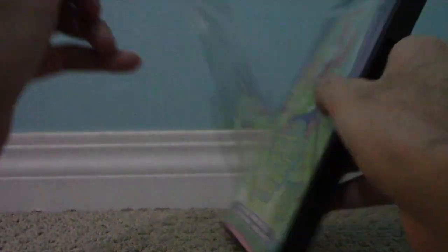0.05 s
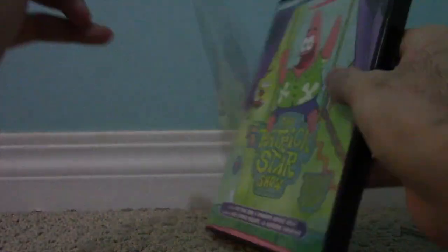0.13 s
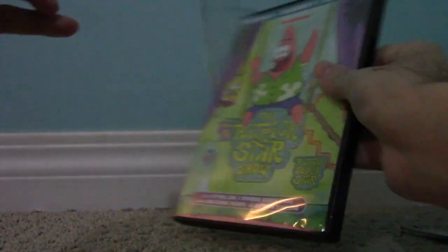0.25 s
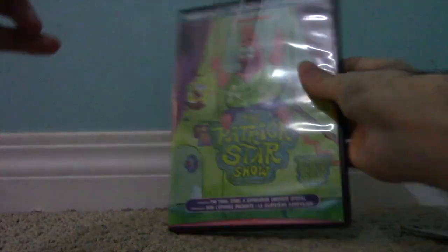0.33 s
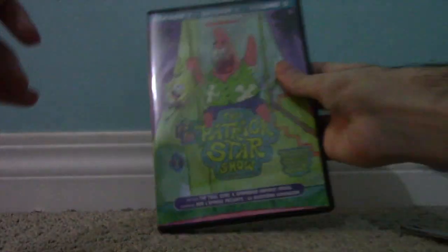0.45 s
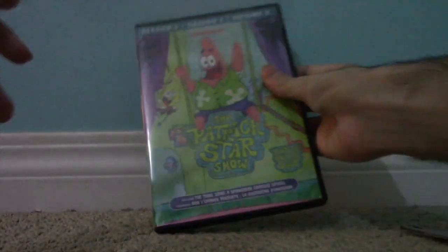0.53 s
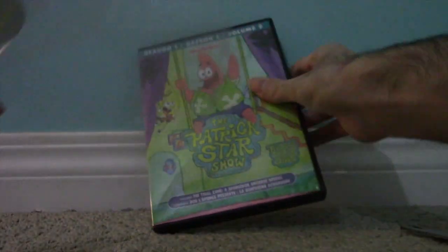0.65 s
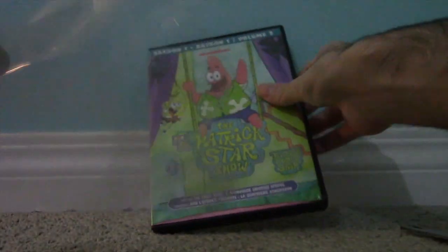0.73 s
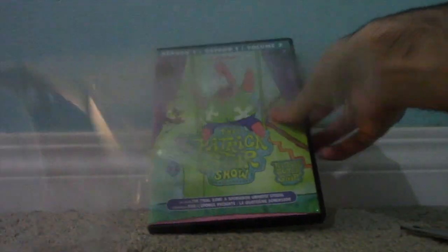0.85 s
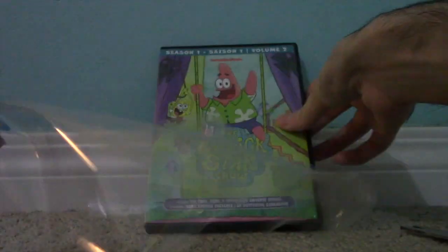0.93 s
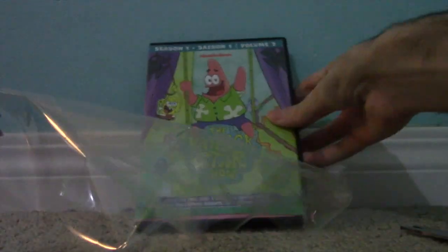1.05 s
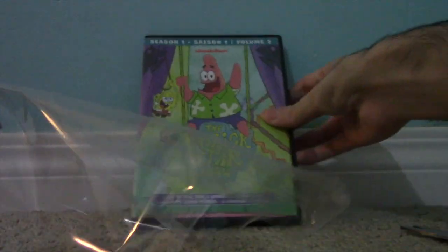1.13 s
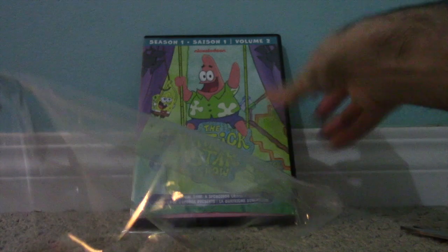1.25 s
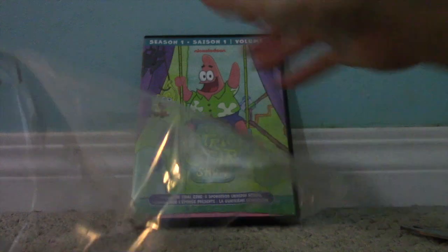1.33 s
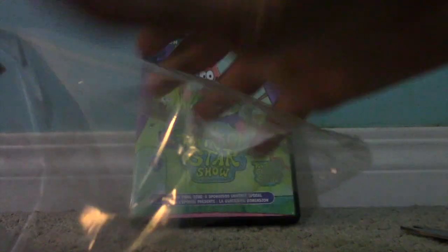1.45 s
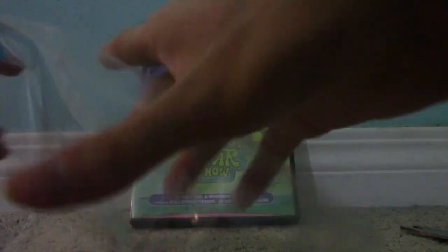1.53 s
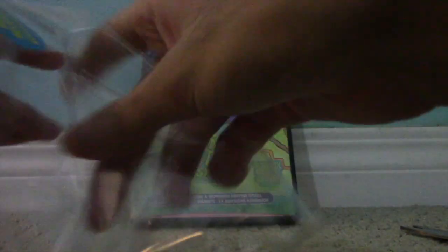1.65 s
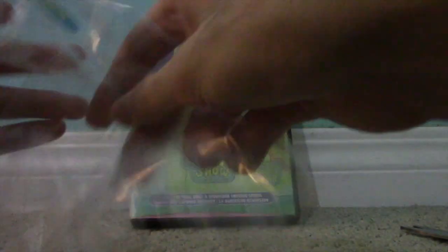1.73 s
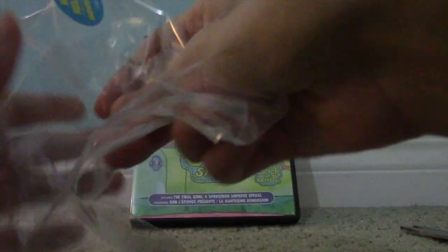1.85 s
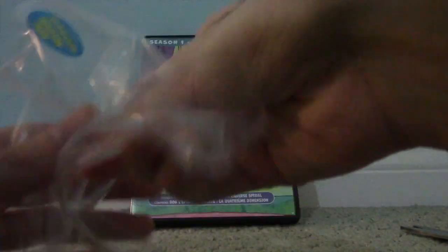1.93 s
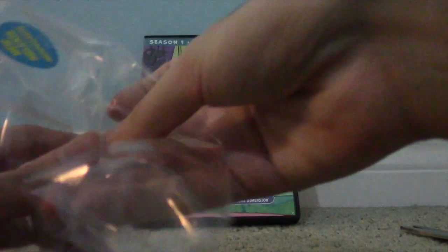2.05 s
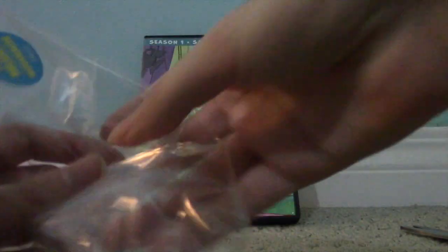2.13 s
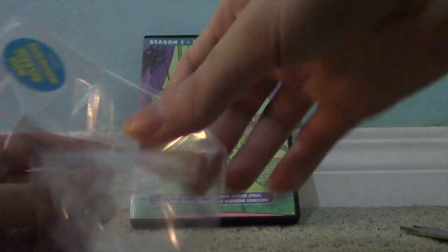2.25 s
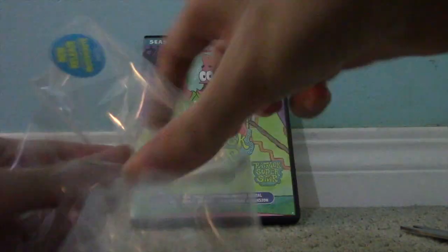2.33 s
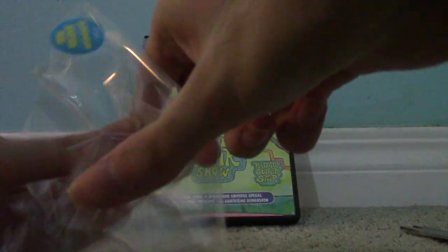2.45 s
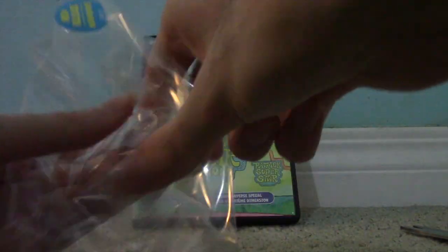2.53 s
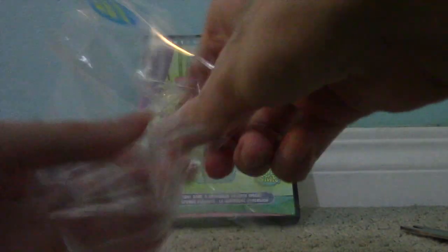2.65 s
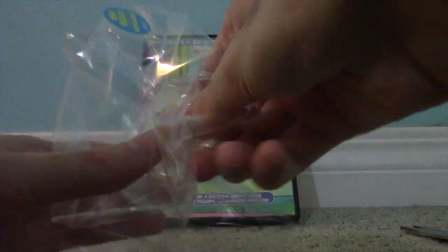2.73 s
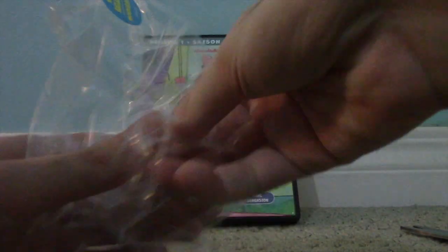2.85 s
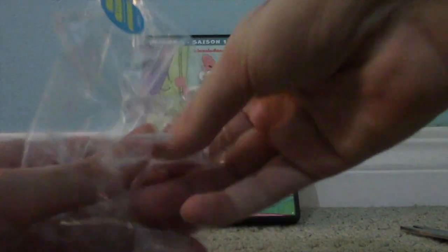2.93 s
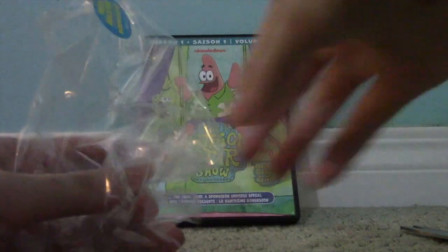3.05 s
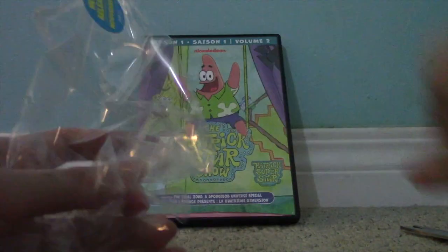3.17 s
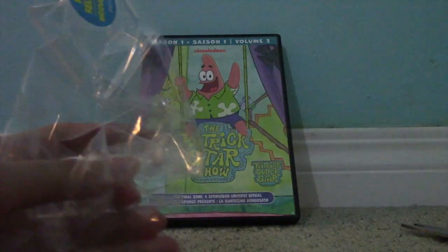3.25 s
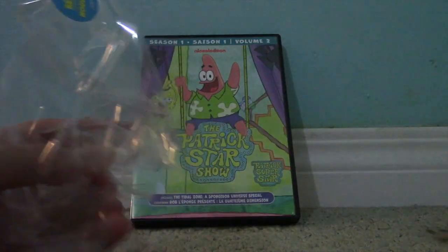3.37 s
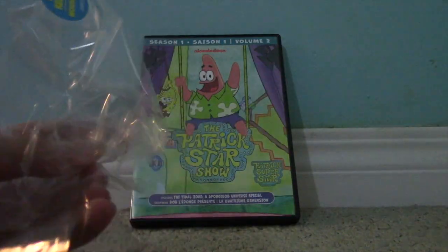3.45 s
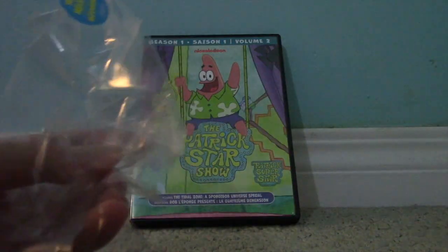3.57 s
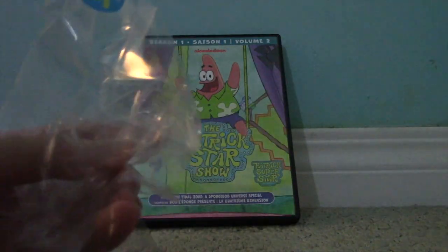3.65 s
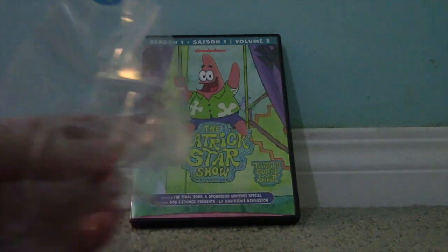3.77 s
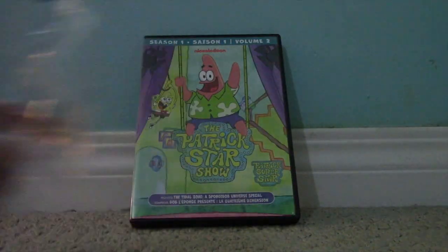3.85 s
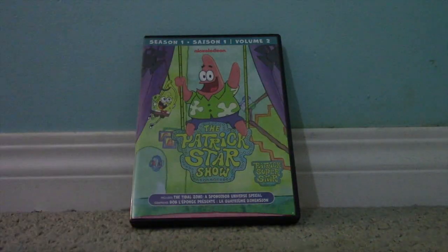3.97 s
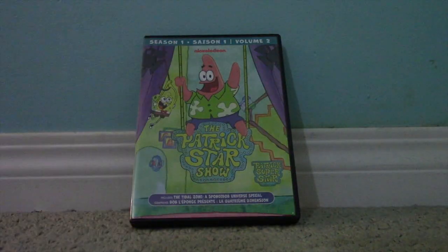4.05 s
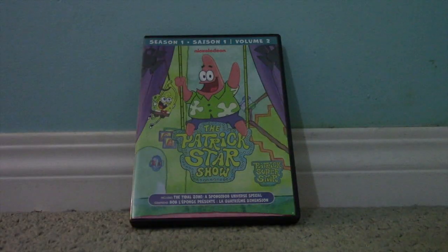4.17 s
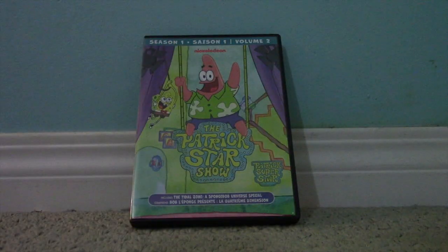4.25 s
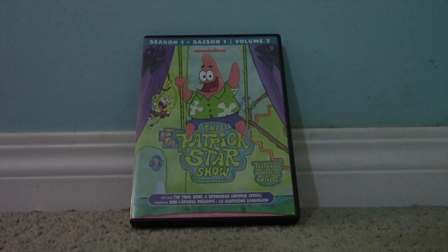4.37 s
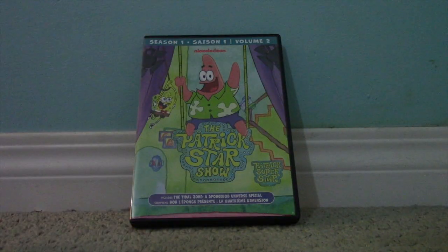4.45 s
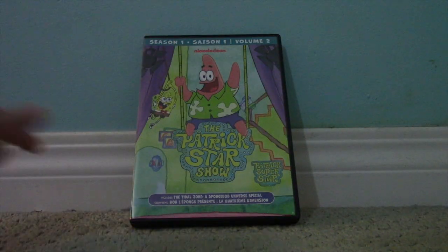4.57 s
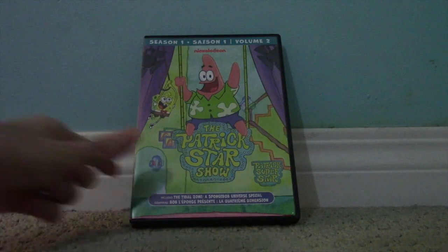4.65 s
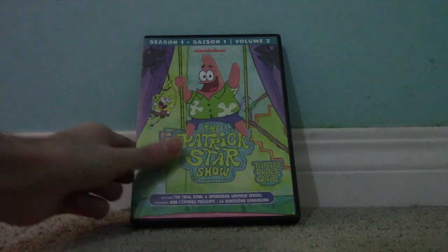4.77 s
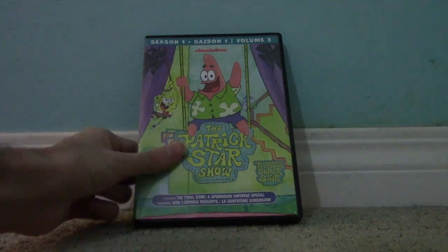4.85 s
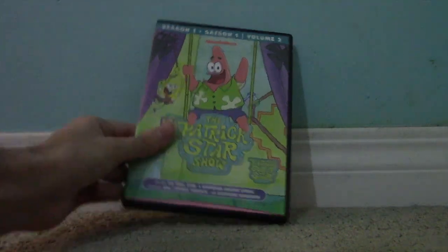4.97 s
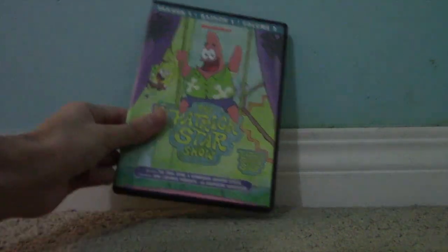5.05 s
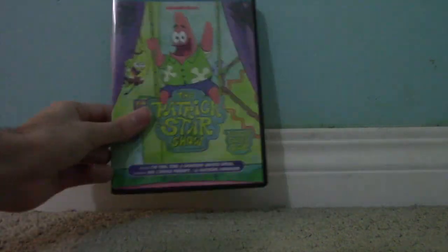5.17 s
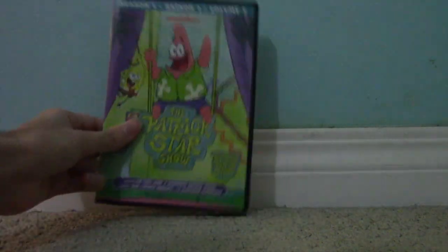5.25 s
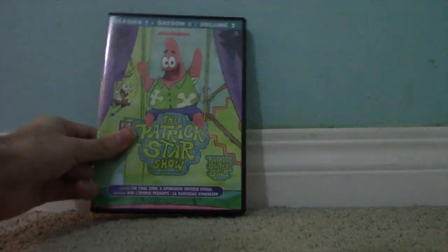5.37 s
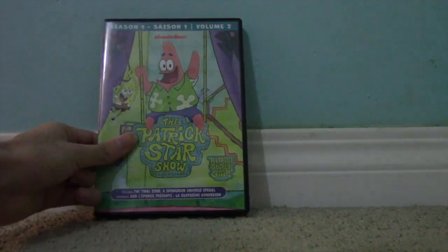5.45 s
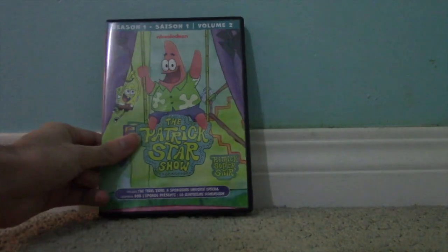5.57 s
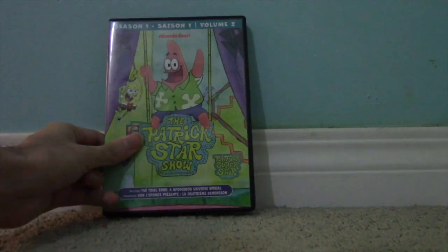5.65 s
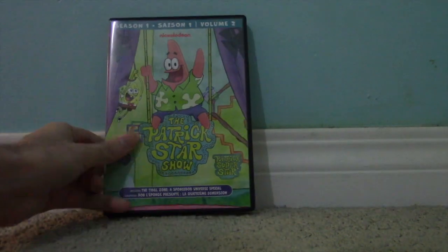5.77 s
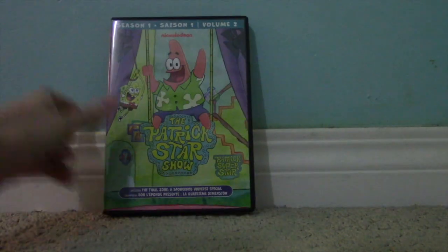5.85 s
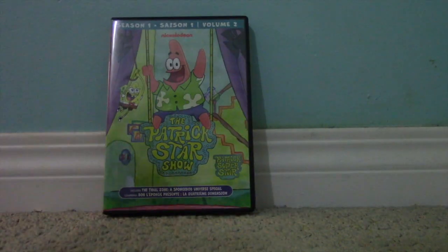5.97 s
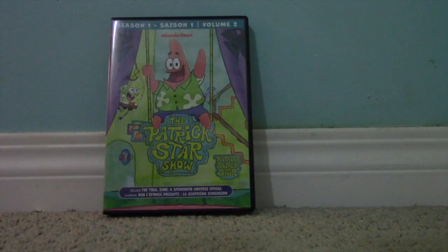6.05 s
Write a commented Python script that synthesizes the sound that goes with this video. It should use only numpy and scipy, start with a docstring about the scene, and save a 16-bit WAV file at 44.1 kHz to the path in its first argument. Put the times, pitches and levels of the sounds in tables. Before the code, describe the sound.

Light film rustle and dry plastic creaks come first, with hollow knocks as a disc case is stood on carpet. Loud crisp crumpling follows in rapid bursts, strongest mid-way, then relaxes into sparse crinkles and dull bumps. After a near-silent pause, fingers faintly rub and shift the case. Close stereo pickup, short dry indoor reverberation, faint room air.

```python
"""In a small carpeted room, thin plastic wrap is pulled off a disc case and crumpled in both hands, close by.
Creases in the film buckle one by one, each a tiny snap; the wad goes on ticking as it relaxes.
The hollow case knocks, creaks and rubs as it is stood on the carpet, then picked up and set straight.
Clicks excite film and case: filtered pulses give the snaps, modes the knocks, stick-slip noise the rubbing."""
import sys
import numpy as np
from scipy import signal
from scipy.fft import rfft, irfft
from scipy.io import wavfile
from scipy.ndimage import uniform_filter1d

SR = 44100
rng = np.random.default_rng(int(sys.argv[2]) if len(sys.argv) > 2 else 0)


def wav_out(sig):
    """Save sig, one row per channel (or a flat mono array), as 16-bit PCM at SR to the path in sys.argv[1]."""
    wavfile.write(sys.argv[1], SR, np.round(np.clip(np.atleast_2d(sig).T, -1, 1) * 32767).astype(np.int16))


N = 269362
TIME = np.arange(N) / SR  # s


def amp(db):
    """Decibel law: level to amplitude gain."""
    return 10 ** (np.asarray(db) / 20)


def evened(x):
    """Normalisation to rms 1."""
    return x / np.sqrt(np.mean(x ** 2) + 1e-20)


def read(points, hz):
    """Interpolation of a spectrum on a logarithmic frequency axis."""
    f, value = np.transpose(points)
    return np.interp(np.log(hz + 1), np.log(f + 1), value)


def add(mix, s, sound):
    """Superposition: adds a sound to the mix, in place, from time s."""
    part = mix[round(s * SR):][:len(sound)]
    part += sound[:len(part)]


def convolve(x, response):
    """Linear filtering by an impulse response, keeping the length of x."""
    return signal.oaconvolve(x, response)[:len(x)]


def pulse(colour, size=2048):
    """Minimum phase: the sharpest causal click of energy 1 with the spectrum colour(Hz) in dB."""
    level_db = np.maximum(colour(abs(np.fft.fftfreq(size, 1 / SR))), -100)
    log_gain = np.log(amp(level_db))
    # the Hilbert transform of the log gain supplies the phase
    spectrum = np.exp(np.conj(signal.hilbert(log_gain)))
    click = np.fft.ifft(spectrum).real
    return click / np.linalg.norm(click)


def hump(hz, centre, octaves):
    """Broad resonance in dB, its skirts tending to an even fall per octave."""
    distance = np.log2((hz + 20) / centre) / octaves
    return 20 * (1 - np.hypot(1, distance))


def tinted(x, colour):
    """Spectral shaping that conserves the power of white noise."""
    return convolve(x, pulse(lambda hz: read(colour, hz)))


def attack_scaled(x, size):
    """Onset normalisation: the first size samples get rms 1."""
    return x / np.sqrt(np.mean(x[:size] ** 2))


def levelled(x, size):
    """Short-time power normalisation: power near 1 over a window, the grain inside it kept."""
    power = uniform_filter1d(uniform_filter1d(x ** 2, size), size)
    floor = .01 * np.mean(x ** 2)
    return x / np.sqrt(abs(power) + floor)


def drift(size):
    """Low-pass randomness: a wandering value of rms 1 that changes over size samples."""
    return evened(uniform_filter1d(rng.standard_normal(N), size))


def slips(per_s, spread_db):
    """Random point process: clicks of random sign, many small and a few large."""
    sizes = amp(spread_db * np.minimum(rng.exponential(1, N), 4))
    signs = rng.choice([-1, 1], N)
    return sizes * signs * (rng.random(N) < per_s / SR)


def flutter(share_db, t60, size=1024):
    """Bending waves: a unit click, then decaying noise of level share_db beside it."""
    waves = rng.standard_normal(size) * amp(-60 * np.arange(size) / SR / t60)
    waves *= amp(share_db) / np.linalg.norm(waves)
    waves[0] = 1
    return waves


def shiver(clicks, share_db, t60):
    """Reverberant energy: each click leaves a short, irregular trembling of the plastic behind it."""
    keep = amp(-120 / (t60 * SR))  # power kept per sample
    power = signal.lfilter([1 - keep], [1, -keep], clicks ** 2)
    return clicks + amp(share_db) * np.sqrt(power) * rng.standard_normal(len(clicks))


def strokes(rows, rise_s, hold_db, fade_db_per_s):
    """Incoherent addition of hand movements: each rises, shifts by hold_db while held, then fades."""
    power = np.zeros(N)
    for start, length, db in rows:
        t = TIME - start
        rise = np.clip(t / rise_s, 0, 1)
        held_db = hold_db * (np.clip(t / length, 0, 1) - .5)
        fade_db = fade_db_per_s * np.maximum(t - length, 0)
        power += (rise * amp(db + held_db - fade_db)) ** 2
    return np.sqrt(power)


# spectrum of the air: (f/Hz, relative level/dB)
AIR_SPECTRUM = [(30, -15.5), (70, -4), (200, -9), (600, -12.5), (7000, -28.5), (16000, -42)]


def air():
    """Stationary broadband noise: the quiet air of the room."""
    return tinted(rng.standard_normal(N), AIR_SPECTRUM)


# decay and colour of the small carpeted room: (f/Hz, t60/s, relative level/dB)
ROOM_DECAY = [(90, 0.6, -3), (300, 0.36, 0), (1030, 0.21, -5), (3230, 0.22, -5), (8000, 0.14, -7)]


def room(x, wet_db=-11, size=20000):
    """Reverberation: a faint tail of sparse reflections; the bass lingers longest."""
    late = np.arange(size) / SR > .005
    taps = rng.standard_normal(size) * (rng.random(size) < .1) * late
    hz, t, z = signal.stft(taps, SR, nperseg=256)
    table = np.array(ROOM_DECAY)
    t60 = read(table[:, :2], hz)[:, None]
    tail = signal.istft(z * amp(-60 * t / t60), SR, nperseg=256)[1]
    tail_hz = np.fft.rfftfreq(len(tail), 1 / SR)
    spectrum = rfft(tail / np.linalg.norm(tail))
    tail = irfft(spectrum * amp(read(table[:, ::2], tail_hz)))
    return amp(wet_db) * convolve(x, tail)


# dull bumps of the hands, each a short round note: (t/s, level/dB, f/Hz)
HAND_BUMPS = [(0.215, -38.5, 450), (3.238, -37, 180), (3.434, -43, 390), (3.555, -23.5, 484),
              (3.573, -27, 492), (3.604, -31.5, 188), (3.644, -30, 507), (3.663, -36.5, 470),
              (4.137, -39.5, 492), (4.479, -42, 779), (4.478, -44.5, 176)]


def bumps(rise_s=0.00089, t60=0.11, thud_db=-6, size=8192):
    """Damped resonance: soft skin sets one low note going, which dies quickly over a rough thud."""
    out, t = np.zeros(N), np.arange(size) / SR
    for s, db, hz in HAND_BUMPS:
        note = np.sin(2 * np.pi * hz * t) * (1 - np.exp(-t / rise_s)) * amp(-60 * t / t60)
        thud = attack_scaled(pulse(lambda f: hump(f, hz, 0.65)), size=256)
        add(note, 0, amp(thud_db) * convolve(thud, flutter(share_db=2.5, t60=0.066, size=2048)))
        add(out, s, amp(db) * note)
    return out


# fingers rubbing on the plastic: (start t/s, length t/s, level/dB before trim)
FINGER_RUBS = [(0.0, 0.38, -50.5), (0.51, 0.76, -42.5), (1.452, 0.4, -42), (1.57, 0.14, -29),
               (1.95, 1, -39), (3.37, 0.34, -42), (3.8, 0.4, -49), (4.42, 0.21, -56), (4.79, 0.25, -48.5),
               (5.26, 0.56, -48.5)]
# spectrum of the rubbed plastic: (f/Hz, relative level/dB)
RUB_SPECTRUM = [(40, -33.5), (110, -3), (220, 1.5), (520, -2.5), (700, 1.5), (1000, -4.5), (1300, -2),
                (1700, -7.5), (3000, -14), (12000, -32.5)]
# edge of the case dragged over the carpet: (start t/s, length t/s, level/dB before trim)
CARPET_DRAGS = [(4.757, 0.019, -45), (4.86, 0.14, -46.5), (5.022, 0.047, -36.5)]
# spectrum of the dragged edge: (f/Hz, relative level/dB)
DRAG_SPECTRUM = [(40, -32), (160, 6.5), (800, -5), (3200, -4), (5000, -21), (14000, -42)]


def rubbing(rub_trim_db=-2, drag_trim_db=-2, patchy_db=3):
    """Stick-slip friction: each catch of skin stirs low and high panel bands unequally; carpet catches too."""
    catches, fingers = slips(500, spread_db=2.3), np.zeros(N)
    for low_hz, high_hz in [(40, 400), (400, 950), (950, 14000)]:
        uneven = catches * amp(patchy_db * rng.standard_normal(N))
        stirred = shiver(uneven, share_db=16, t60=0.014)
        panel = signal.butter(2, [low_hz, high_hz], "band", fs=SR, output="sos")
        fingers += signal.sosfilt(panel, levelled(stirred, size=3500))
    fingers *= amp(2.8 * drift(size=900))
    rub_gain = strokes(FINGER_RUBS, rise_s=0.0047, hold_db=-2.5, fade_db_per_s=113.5)
    fingers *= amp(rub_trim_db) * rub_gain
    pile = levelled(shiver(slips(700, spread_db=2.2), share_db=2, t60=.007), size=1100)
    drag_gain = strokes(CARPET_DRAGS, rise_s=0.016, hold_db=-5.5, fade_db_per_s=292)
    pile *= amp(drag_trim_db) * drag_gain
    return tinted(fingers, RUB_SPECTRUM) + tinted(pile, DRAG_SPECTRUM)


# the lid shifts against the shell under the fingers, a short dry creak each time: (t/s, level/dB)
LID_CREAKS = [(0.117, -36.5), (0.23, -38), (0.329, -34.5), (0.354, -36.5), (0.532, -32.5), (0.728, -36.5),
              (0.9725, -27.5), (1.154, -32), (1.172, -33.5), (1.2307, -33), (4.756, -47), (4.81, -54),
              (4.842, -45), (4.879, -40), (4.977, -43.5), (5.202, -43), (5.2247, -39.5), (5.25, -42.5),
              (5.3, -38), (5.326, -35.5), (5.353, -39), (5.476, -49), (5.49, -38.5), (5.576, -39.5),
              (5.59, -46), (5.63, -40), (5.678, -50.5), (5.716, -41), (5.825, -49)]
# spectrum of a creak: (f/Hz, relative level/dB)
CREAK_SPECTRUM = [(100, -16), (600, -4), (1300, 3.5), (1800, -16.5), (3500, -15.5), (14000, -44.5)]


def creaks(length_s=0.0077):
    """Micro-slip friction: a dense run of tiny slips as a noise burst, sharp at onset and soon over."""
    out, t = np.zeros(N), TIME[:2048]
    for s, db in LID_CREAKS:
        burst = rng.standard_normal(len(t)) * np.exp(-(t / length_s) ** 2)
        run = tinted(burst, CREAK_SPECTRUM)
        add(out, s, amp(db) * attack_scaled(run, size=256))
    return out


# hollow knocks of the case: (t/s, level/dB before trim, f/Hz,
# contact tick level/dB before trim and rebound level/dB, both relative to the knock)
CASE_KNOCKS = [(0.4684, -30.5, 940, 0.5, -30), (0.6126, -14.5, 780, -3, -4.5), (0.686, -26, 710, -7, -2.5),
               (1.0836, -19, 1100, -12, -29), (3.5572, -28.5, 603, 3, -7), (4.1383, -39.5, 720, 0, -15),
               (5.3848, -27.5, 710, 3, -4.5), (5.7499, -27, 1190, -15, -25.5)]
# modes of the case: (f/Hz, relative level/dB, t60/s)
CASE_MODES = [(205, 5, 0.11), (307, -5, 0.14), (436, 23.5, 0.013), (670, 8.5, 0.078), (1000, 0.5, 0.086),
              (1195, 28, 0.0084), (1384, 14.5, 0.032)]
# crack of hard plastic meeting plastic: (f/Hz, relative level/dB)
CRACK_SPECTRUM = [(300, -12), (1900, -7), (3100, 0), (3800, -6), (5500, -8), (16000, -33)]
# the loose lid chatters after a knock: (delay t/s, level/dB relative to the rebound level)
LID_CHATTER = [(0.0045, -9.5), (0.0145, -3)]


def knocks(trim_db=-1, ring_db=-13, tick_trim_db=-2, thump_db=-5, thump_hz=260, ring_octaves=1.0, size=8192):
    """Modal excitation: a blow pushes the panel, rings modes near its pitch, thumps the body and ticks."""
    out, t = np.zeros(N), np.arange(size) / SR
    mode_hz, mode_db, t60 = np.transpose(CASE_MODES)[:, :, None]
    crack = pulse(lambda f: read(CRACK_SPECTRUM, f))
    # each knock lands, then the lid chatters
    landings = [(s, db, hz, hard_db) for s, db, hz, hard_db, _ in CASE_KNOCKS]
    rebounds = [(s + late, db + back_db + soft_db, hz, hard_db)
                for s, db, hz, hard_db, back_db in CASE_KNOCKS for late, soft_db in LID_CHATTER]
    for s, db, hz, hard_db in landings + rebounds:
        # the grip detunes the modes, and the place of the blow sets their phases
        grip, place = rng.uniform(-1, 1, (2, len(CASE_MODES), 1))
        modes = np.sin(2 * np.pi * mode_hz * (1 + 0.017 * grip) * t + np.pi * place)
        ring = (modes * amp(mode_db + hump(mode_hz, hz, ring_octaves) - 60 * t / t60)).sum(0)
        blow = amp(ring_db) * ring * (1 - np.exp(-t / 0.000093))
        contact = attack_scaled(pulse(lambda f: hump(f, hz, 0.44)), size=88)
        tick = attack_scaled(convolve(crack, flutter(share_db=22.5, t60=0.013)), size=66)
        add(contact, 0, amp(hard_db + tick_trim_db) * tick)
        # the hollow shell shudders after the contact
        shudder = flutter(share_db=-6, t60=0.07, size=4096)
        add(blow, 0, convolve(np.pad(contact, (0, size)), shudder))
        # duller blows move more of the body
        thump = attack_scaled(pulse(lambda f: hump(f, thump_hz, .3)), size=256)
        add(blow, 0, amp(thump_db) * thump_hz / hz * thump)
        add(out, s, amp(db + trim_db) * blow)
    return out


# smooth film sliding past: (peak t/s, level/dB before the film's gains, e-folding time/s)
FILM_SLIDES = [(0.01, -41, 0.076), (0.33, -50, 0.08), (0.98, -49, 0.2), (4.12, -38, 0.1),
               (4.622, -49.5, 0.04)]


def slides():
    """Exponential growth and decay: gain of the sliding film about each peak."""
    return sum(amp(db) * np.exp(-abs(TIME - s) / fold_s) for s, db, fold_s in FILM_SLIDES)


# the hands tug or squeeze the film: (start t/s, length t/s, level/dB)
FILM_SQUEEZES = [(0.77, 0.11, -49), (1.456, 0.36, -38), (1.59, 0.14, -23.5), (1.79, 0.14, -31),
                 (1.872, 0.026, -21.5), (1.96, 0.054, -26.5), (2.03, 0.1, -21.5), (2.17, 0.034, -25),
                 (2.265, 0.35, -24), (2.583, 0.092, -18.5), (2.775, 0.19, -23), (2.96, 0.066, -20),
                 (3.09, 0.024, -29.5), (3.32, 0.21, -46), (3.84, 0.33, -46.5)]


def squeezing(grip_s=0.013, tighten_db=2, let_go_db_per_s=300.5, relax_db=-5, relax_db_per_s=69):
    """Loading and relaxation: gain that follows each squeeze, then the slower relaxing of the wad."""
    held = strokes(FILM_SQUEEZES, grip_s, tighten_db, let_go_db_per_s)
    relaxing = amp(relax_db) * strokes(FILM_SQUEEZES, grip_s, tighten_db, relax_db_per_s)
    return np.maximum(held, relaxing)


# spectrum of the film, for its snaps and its crackle: (f/Hz, relative level/dB)
FILM_SPECTRUM = [(40, -36), (120, -7), (260, 4.5), (720, 7), (1050, 5.5), (2200, 4), (5000, 2.5), (7800, 4),
                 (10000, -0.5), (12500, -8), (16000, -17)]


def snap(hz, octaves=1.15):
    """Snap-through buckling: one crease flips at its own pitch, then the film shivers briefly."""
    flip = pulse(lambda f: hump(f, hz, octaves) + np.minimum(read(FILM_SPECTRUM, f), 0))
    flip = convolve(flip, flutter(share_db=3, t60=0.004))
    return attack_scaled(convolve(flip, flutter(share_db=-7, t60=0.014)), size=44)


# sliding film is strongest around 3 kHz, with less bass and less extreme top than buckling film:
# (f/Hz, level/dB relative to the film spectrum)
SWISH_SPECTRUM = [(200, -3), (900, 0.5), (3000, 7.5), (6000, 3), (16000, -4)]


def crumple(swish_db=-25, facet_hz=5800, count=14):
    """Crackling noise: squeezing buckles more creases; small facets crackle high, wide ones pop low."""
    crush, sliding = squeezing(), slides() * amp(2.2 * drift(size=700))
    # the drifting rate gathers the buckles into short cascades
    per_s = (360 + 2800 * crush / crush.max()) * amp(4.3 * drift(size=350))
    small, wide = slips(per_s, spread_db=4.9), slips(per_s / 2, spread_db=3.8)
    # each facet has its own pitch, and the run of pitches drifts
    octaves_off = .8 * rng.standard_normal(N) + .45 * drift(size=600)
    pitch = facet_hz * 2 ** octaves_off
    centres, hz = np.geomspace(150, 14000, count), np.fft.rfftfreq(N, 1 / SR)
    bands = amp(hump(hz, centres[:, None], .34))
    bands /= np.linalg.norm(bands, axis=0)  # band powers sum to 1
    crackle = np.zeros(N)
    for centre, band in zip(centres, bands):
        buckles = small * amp(hump(centre, pitch, .75)) + wide * (1000 / centre) ** 2
        buckles = buckles * rng.choice([-1, 1], N)
        buckles = shiver(buckles, share_db=0, t60=.0035)
        buckles = shiver(buckles, share_db=-15, t60=.016)
        crackle += irfft(rfft(levelled(buckles, size=2100)) * band, N)
    swish = tinted(levelled(slips(9000, spread_db=3), size=1000), SWISH_SPECTRUM)
    # squeezed film mostly buckles, while sliding film also swishes
    crackle_gain = np.hypot(crush, 0.6 * sliding)
    swish_gain = np.hypot(amp(swish_db) * crush, 0.5 * sliding)
    return tinted(crackle_gain * crackle + swish_gain * swish, FILM_SPECTRUM)


# single creases and ticks of the film, loud and faint: (t/s, level/dB before trim, f/Hz)
SINGLE_SNAPS = [(0.0461, -26.5, 4800), (0.555, -12.5, 4580), (0.5844, -28.5, 5700), (0.654, -19.5, 4630),
                (0.7567, -30, 5360), (0.7974, -26, 6200), (0.844, -30, 4570), (0.8875, -19, 6660),
                (1.0276, -33, 2800), (1.0656, -27, 3800), (1.315, -30, 5520), (1.426, -38, 2990),
                (1.458, -26, 5400), (1.5088, -28.5, 2800), (1.5264, -17.5, 4840), (1.564, -15.5, 3550),
                (1.5944, -8, 4530), (1.605, -11, 4900), (1.6867, -16.5, 4000), (1.7117, -9, 7500),
                (1.7839, -6.5, 8500), (1.878, -10, 5630), (1.887, -21, 5440), (2.0695, -40.5, 6270),
                (2.0957, -16, 5800), (2.1165, -14, 6000), (2.126, -20.5, 5000), (2.1743, -15, 9000),
                (2.1911, -9.5, 5540), (2.2673, -10.5, 3150), (2.3038, -12.5, 7000), (2.3297, -13, 5700),
                (2.3871, -12, 3610), (2.43, -11, 4180), (2.509, -16, 3040), (2.5518, -9.5, 7500),
                (2.591, -14.5, 6660), (2.6233, -19, 6590), (2.6308, -13.5, 4210), (2.737, -17.5, 900),
                (2.7436, -17, 7160), (2.7668, -21, 4350), (2.8103, -16.5, 7530), (2.824, -10, 6800),
                (2.842, -14, 4300), (2.874, -11, 7000), (2.9507, -22, 2980), (2.9769, -5, 6600),
                (3.0032, -6.5, 6800), (3.0247, -10.5, 6750), (3.056, -18.5, 4300), (3.094, -24, 4260),
                (3.129, -24, 5000), (3.1915, -23, 5400), (3.24, -29, 2700), (3.2642, -27, 2970),
                (3.3451, -25, 4900), (3.377, -18, 2800), (3.4731, -22.5, 7500), (3.4765, -24.5, 2580),
                (3.5066, -37, 2480), (3.6076, -30, 1620), (3.6522, -26.5, 2050), (3.7054, -24.5, 2480),
                (3.7335, -22.5, 8350), (3.8092, -31, 2880), (3.8567, -23.5, 7760), (4.1043, -28, 3000),
                (4.435, -40.5, 2500), (5.081, -40, 3260), (5.147, -46.5, 3500)]


def creases(trim_db=-1):
    """Discrete buckling events: single creases and ticks, loud and faint, each placed by time."""
    out = np.zeros(N)
    for s, db, hz in SINGLE_SNAPS:
        add(out, s, amp(db + trim_db) * snap(hz))
    return out


# difference between the two microphone ports: (f/Hz, level/dB relative to the sound)
PORT_DIFFERENCE = [(60, -29), (250, -20), (1200, -38.5), (4500, -21)]


def scene(air_db=-65, air_side_db=-71, balance_db=.25):
    """Mid-side stereo: film and case near the middle, the air of the room from all around."""
    near = creases() + crumple() + knocks() + creaks() + bumps() + rubbing()
    heard = near + room(near)
    mid = heard + amp(air_db) * air()
    # the place of the sound wanders between the two ports
    place = drift(size=400)
    port_gain = amp(read(PORT_DIFFERENCE, np.fft.rfftfreq(N, 1 / SR)))
    side = irfft(rfft(place * heard) * port_gain, N) + amp(air_side_db) * air()
    return np.array([(mid + side) * amp(balance_db), (mid - side) * amp(-balance_db)])


def record(dry, low_cut_hz=65, edge_hz=16100):
    """Band limiting and soft saturation: deep bass is lost, tall peaks are rounded, the top is cut."""
    thinned = signal.sosfilt(signal.butter(2, low_cut_hz, "high", fs=SR, output="sos"), dry)
    rounded = .7 * np.tanh(thinned / .7)
    low_pass = signal.firwin(401, edge_hz, window=("kaiser", 9), fs=SR)
    return signal.oaconvolve(rounded, low_pass[None], "same")


dry = scene()
out = record(dry)
wav_out(out)
```